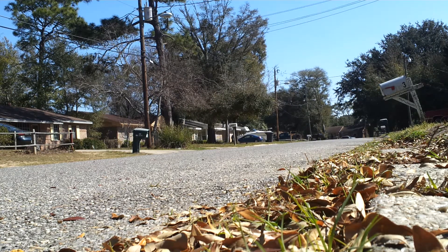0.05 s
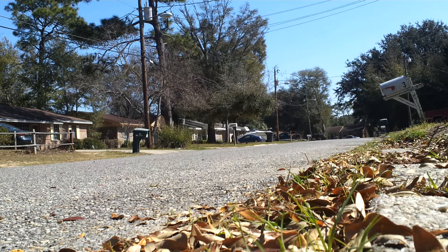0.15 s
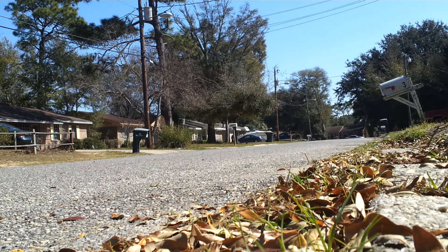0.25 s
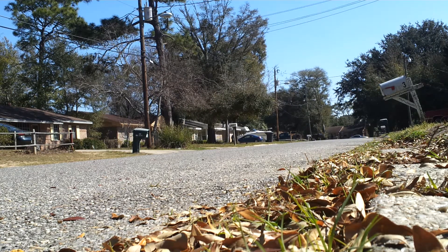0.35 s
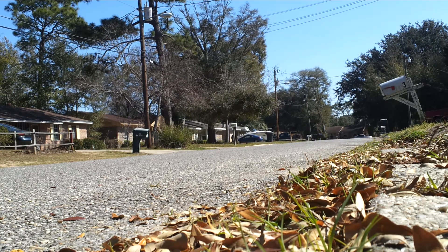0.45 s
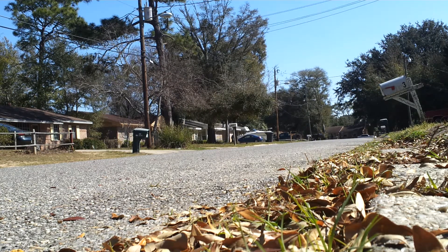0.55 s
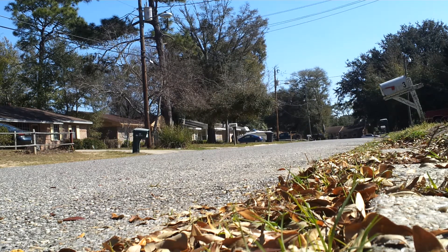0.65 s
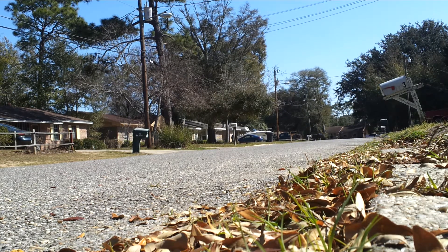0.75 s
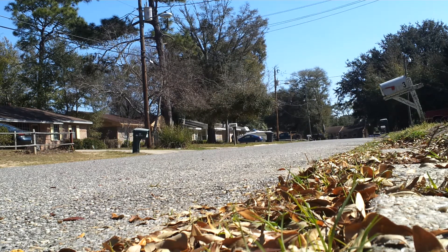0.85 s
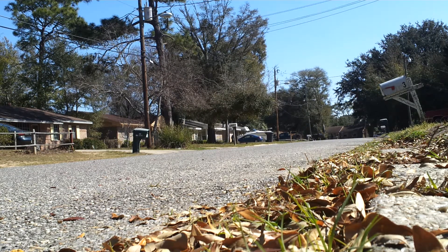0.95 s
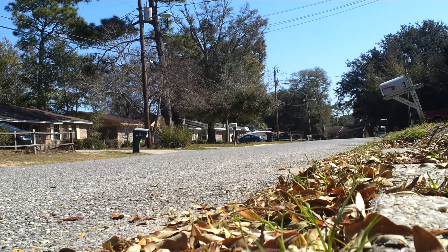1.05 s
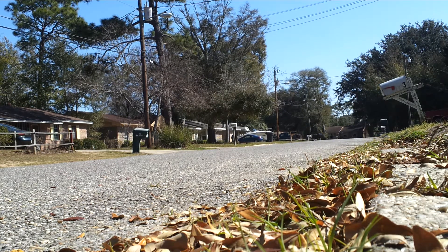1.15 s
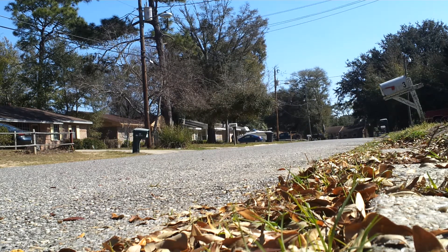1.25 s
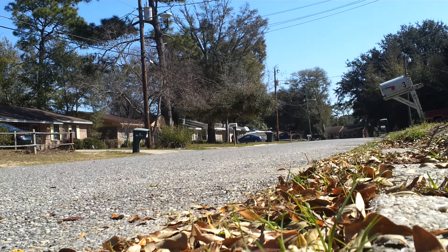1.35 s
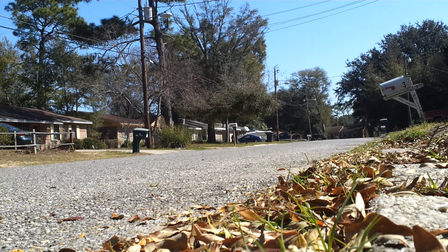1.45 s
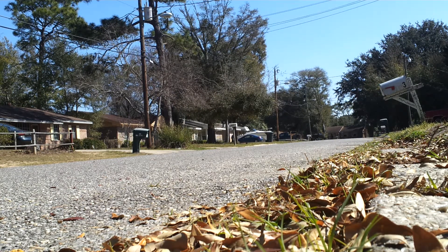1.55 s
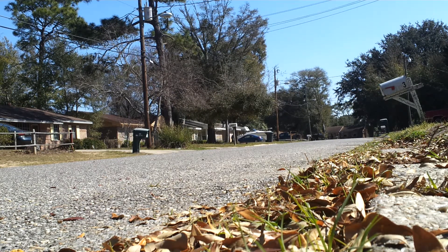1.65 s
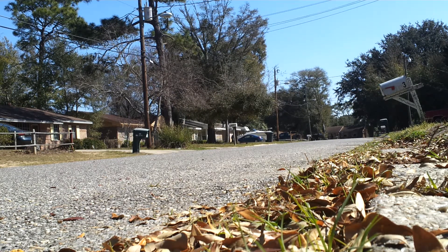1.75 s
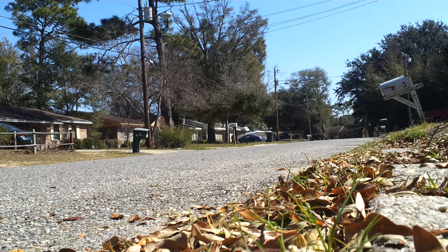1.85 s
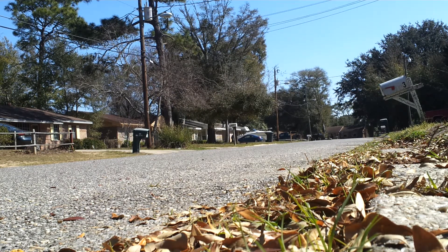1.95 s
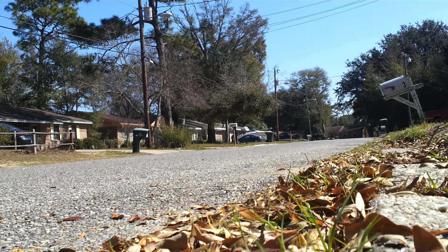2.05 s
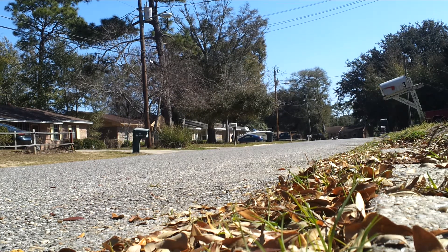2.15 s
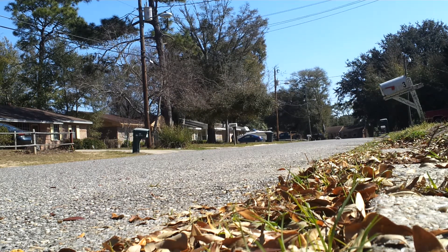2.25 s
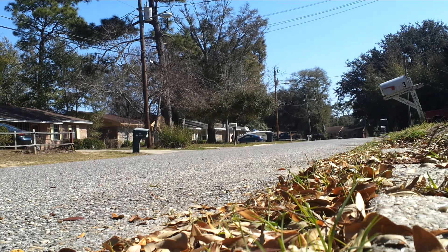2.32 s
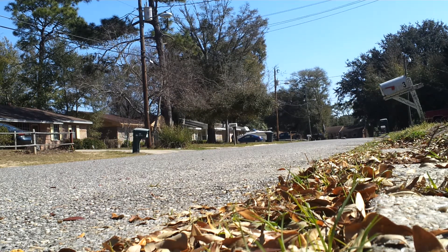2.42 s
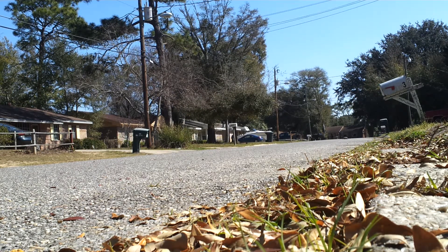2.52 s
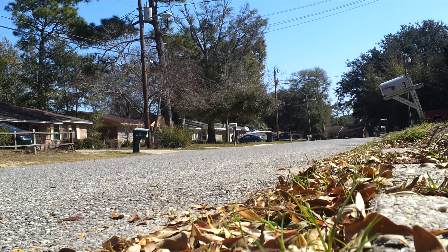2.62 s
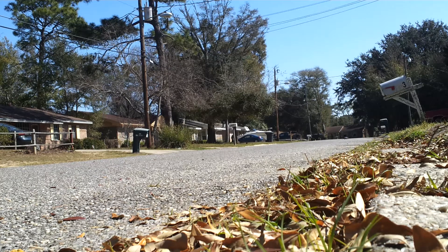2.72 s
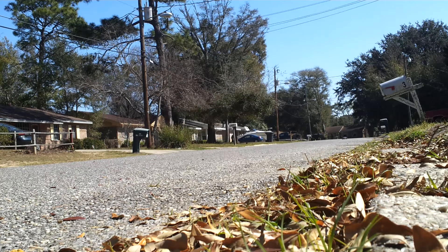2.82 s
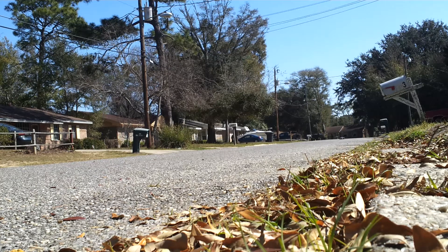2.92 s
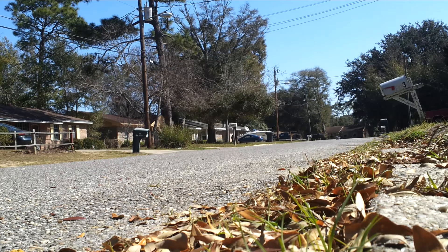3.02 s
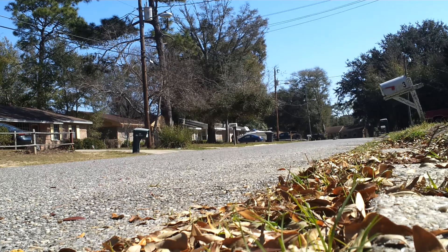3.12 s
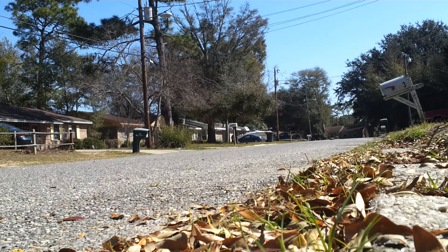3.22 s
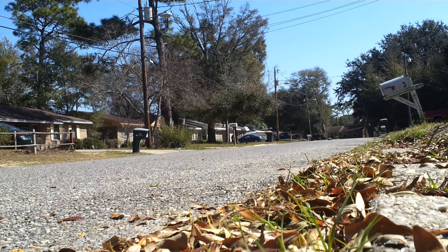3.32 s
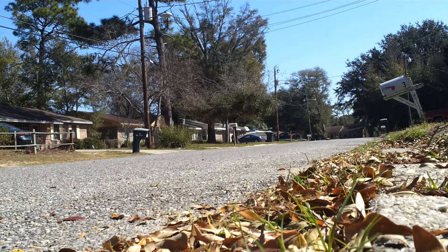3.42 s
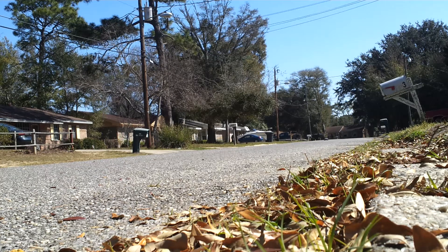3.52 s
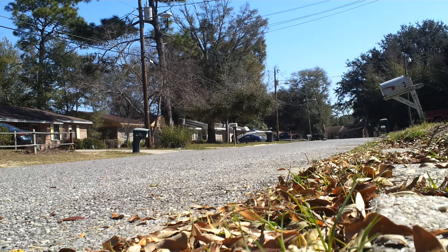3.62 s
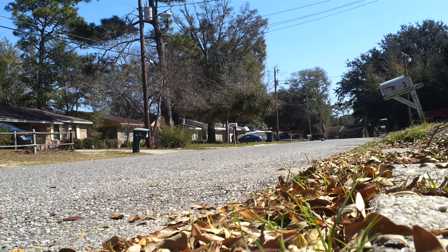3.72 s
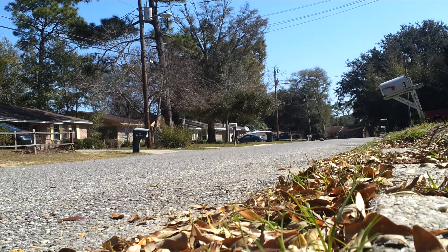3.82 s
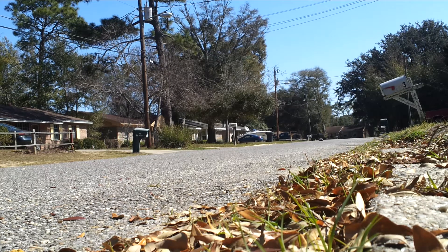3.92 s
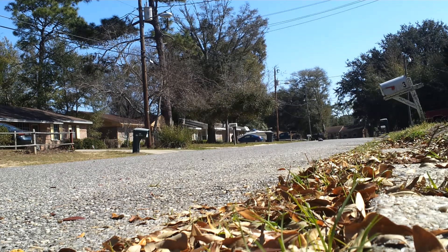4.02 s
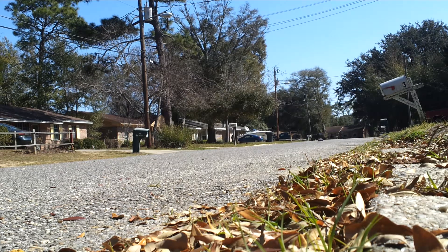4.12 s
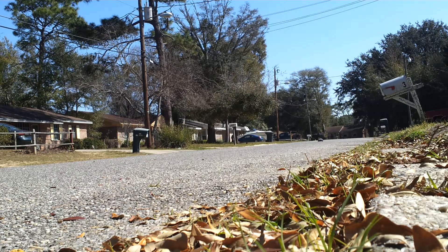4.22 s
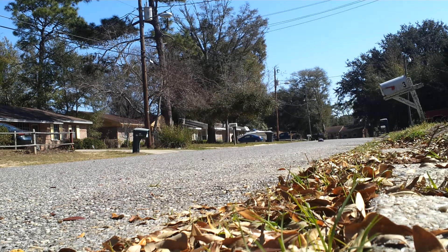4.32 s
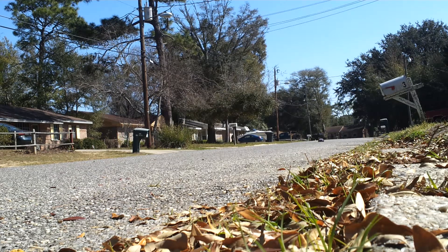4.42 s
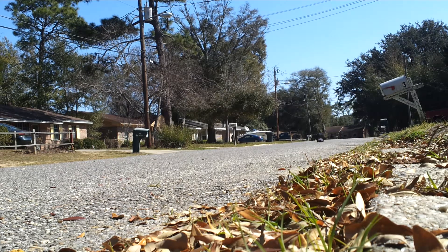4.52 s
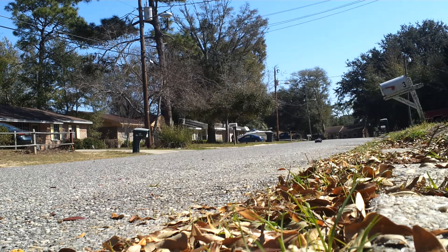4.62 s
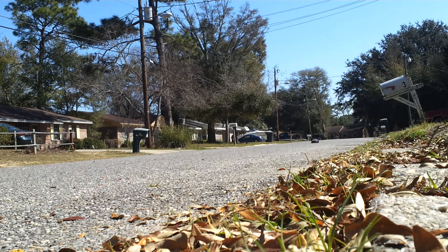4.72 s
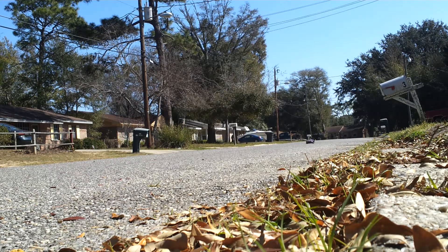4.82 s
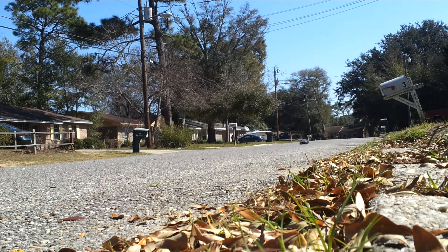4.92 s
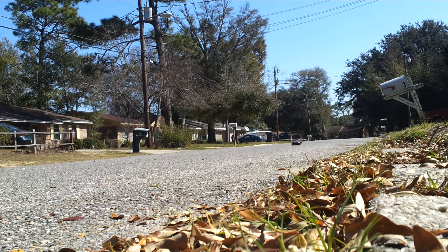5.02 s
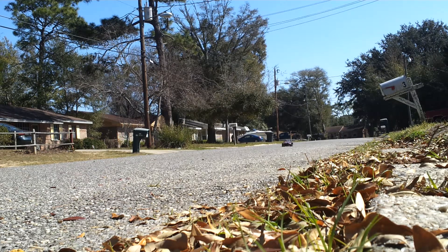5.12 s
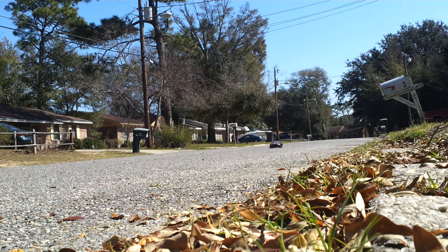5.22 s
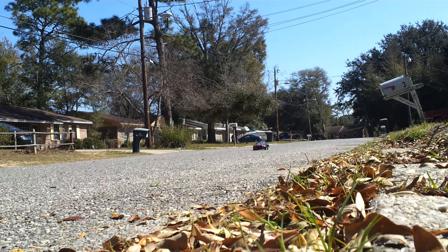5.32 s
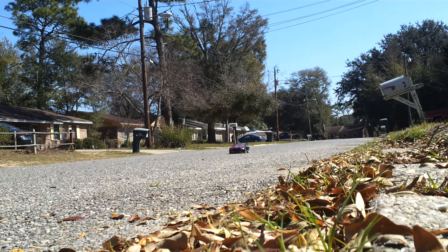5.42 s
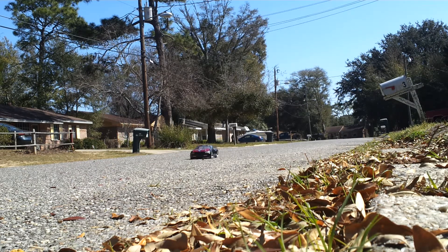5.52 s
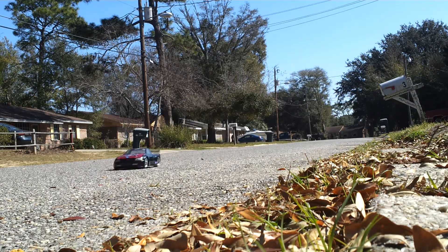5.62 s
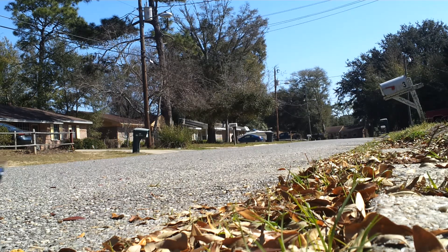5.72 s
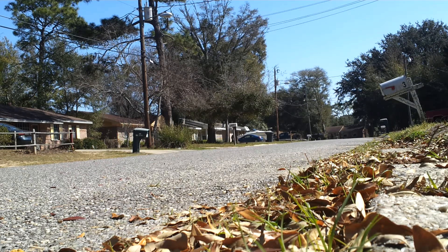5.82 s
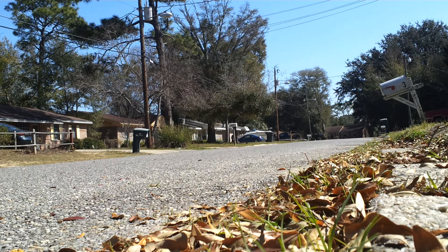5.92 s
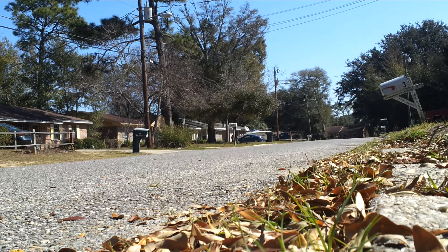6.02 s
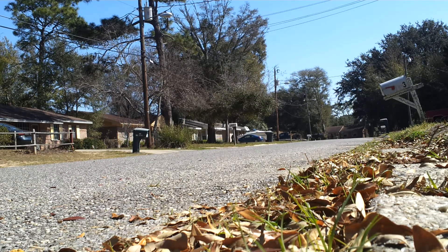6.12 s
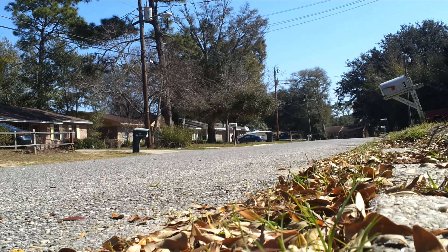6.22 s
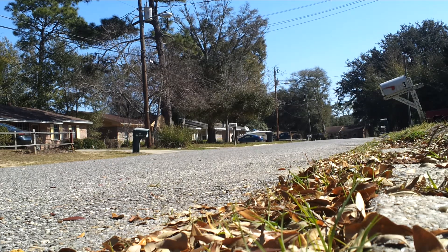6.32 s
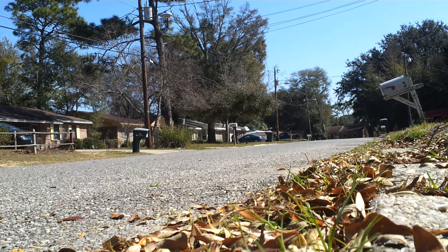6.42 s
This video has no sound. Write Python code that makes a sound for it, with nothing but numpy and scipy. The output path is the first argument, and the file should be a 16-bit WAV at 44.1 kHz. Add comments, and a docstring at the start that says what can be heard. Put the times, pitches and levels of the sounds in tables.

```python
"""A street hushes and a distant engine drones; close by, dry leaves tick and something scuffs on the verge.
A far bird calls once and echoes. Then a small electric radio-controlled truck starts far up the gravelly
street: its motor whine climbs, its gears sing and its hollow tyres roar, crunch grit and fling fine spray.
It races past a microphone at the verge, bumping it with air; then the throttle closes and the whine drops,
while thrown gravel lands in the leaves. Noise, tiny random impacts and fluttering tones make these sounds."""
import sys
import numpy as np
from scipy.fft import rfft, irfft, next_fast_len
from scipy.io import wavfile
from scipy.ndimage import map_coordinates

SR = 44100
rng = np.random.default_rng(int(sys.argv[2]) if len(sys.argv) > 2 else 0)


def store_pcm(level_fs):
    """Save levels as 16-bit WAV."""
    pcm = np.round(np.clip(level_fs, -1, 1) * 32767).astype(np.int16)
    wavfile.write(sys.argv[1], SR, np.atleast_2d(pcm).T)


N = 284886  # length in samples

# Open-air hush, its tone colour: pitch_hz, level_db (per Hz, relative)
STREET_COLOUR = [(25, -24.5), (60, -12), (100, -9), (160, -13), (280, -17.5), (400, -19), (600, -19.5),
                 (1050, -23), (1400, -31), (2200, -31.5), (4500, -33.5), (7000, -41), (12000, -36),
                 (16000, -52)]
# Distant engine swelling under load: centre_s, half_length_s, rise_db (over idle)
ENGINE_SWELLS = [(1.89, 0.28, 8), (3.046, 0.48, 7.5)]
# Flurries of faint leaf ticks: centre_s, half_length_s, level_db
FLURRIES = [(.1, 0.22, -56), (2.21, 0.12, -50), (2.686, 0.46, -57), (3.745, 0.28, -56), (6.256, 0.13, -44)]
# Dull scuffs on the verge: start_s, level_db, t60_s (time to die away by 60 dB)
SCUFFS = [(.06, -46, 0.91), (0.517, -32, 0.23), (.665, -45, 0.54), (0.842, -41, 0.062), (0.865, -38, 0.17),
          (2.233, -27.5, 0.014), (3.074, -41.5, 0.1), (3.218, -31, 0.013), (3.369, -32, .06),
          (3.843, -35, 0.089), (6.16, -28, 0.083)]
# Tone colour of scuffed soil: pitch_hz, level_db (per Hz, relative)
SOIL_COLOUR = [(150, -19), (450, -1), (900, 3), (1300, -2), (1800, -4), (2800, -12.5), (6000, -15),
               (11000, -48)]
# Crunches of leaves and showers of gravel: peak_s, level_db, rise_s, t60_s
CRUNCHES = [(.271, -39, .0016, 0.13), (0.571, -37.5, 0.02, 0.15), (.68, -49.5, 0.064, 0.78),
            (.909, -51, 0.011, 0.78), (1.169, -41.5, .0023, 0.22), (3.577, -35.5, 0.0073, .11),
            (5.348, -30, .0006, 0.016), (6.145, -13.5, 0.0024, 0.04), (6.17, -18.5, 0.0056, 0.12)]
# The loudest leaf ticks and landing chips: start_s, level_db, pitch_hz, snap_db (relative to the tick)
TICKS = [(0.0136, -19.5, 4450, -7), (0.1079, -13.5, 4160, -36), (0.2275, -22.5, 5030, -22),
         (0.27, -23, 4700, -33), (1.1683, -15.5, 4670, -35), (1.3007, -20.5, 4660, -31),
         (1.3372, -18.5, 4500, -15), (1.478, -25.5, 3950, -10), (1.49, -21.5, 4940, -9),
         (1.9542, -23, 4680, 1), (2.0152, -22, 5060, -17), (2.046, -17, 4500, -29),
         (2.0898, -15.5, 6800, -12), (2.1113, -9.5, 3990, -14), (2.116, -12, 4900, -16),
         (2.1263, -10, 4600, -13), (2.1846, -12, 4820, -13), (2.2028, -15, 4300, -23),
         (2.228, -11, 4150, -15), (2.2317, -8, 4700, -19.5), (2.248, -19, 4600, -16),
         (2.3294, -13, 4870, -16), (2.398, -8.5, 3370, -43), (2.4466, -18, 4900, -20),
         (2.5965, -11, 4220, -25), (2.6272, -22, 4460, -15), (2.688, -19.5, 2940, -28),
         (2.8956, -13, 4470, -27), (2.9971, -18, 4140, -20), (3.0743, -18.5, 3080, -11),
         (3.2185, -16.5, 4500, -13.5), (3.583, -26, 6500, 0), (3.6352, -24.5, 6540, -2.5),
         (3.748, -18.5, 4500, -10), (3.762, -26.5, 4970, -4), (3.8679, -17.5, 4160, -24),
         (3.9716, -20.5, 4550, -22), (4.4867, -15.5, 4500, -29), (5.091, -21, 4000, -38),
         (5.1443, -13, 4960, -34), (5.347, -6, 4100, -41), (5.3589, -14, 4000, -38),
         (6.007, -11.5, 4790, -1), (6.1594, 3, 4100, -18), (6.1735, 1.5, 4060, -12.5),
         (6.2579, -11, 3030, -29), (6.3797, -18, 3790, -23)]
# Tyre and body-shell resonances: pitch_hz, width_hz, level_db
SHELL_RINGS = [(619.7, 32, -25), (823, 45, -43), (1083, 50, -30)]
# Tone colour of the hollow tyres' roar: pitch_hz, level_db (per Hz, relative)
ROAR_COLOUR = [(59, -45), (100, -31), (190, -16), (290, -15), (450, -4.5), (620, -3.5), (850, -3),
               (1080, -7.5), (1350, -14.5), (2000, -16.5), (3500, -50)]
# Tone colour of crunching grit: pitch_hz, level_db (per Hz, relative)
GRIT_COLOUR = [(900, -23.5), (1500, -5), (2000, 2.5), (3000, 2.5), (4200, 5), (6000, -2), (8000, -20),
               (12000, -78)]
# Tone colour of the finest flying sand: pitch_hz, level_db (per Hz, relative)
SPRAY_COLOUR = [(4500, -21), (6800, 4), (8000, -0.5), (11300, -4), (15800, -21.5)]

# the distant engine idles and later moves off
ENGINE_HZ, IDLE_DB, ENGINE_LEAVES_S, ENGINE_FADE_DB_PER_S = 60.3, -53, 3.66, 20
# the bird's note ends at BIRD_END_HZ, having started twice the half fall above it
BIRD_S, ECHO_DELAY_S, BIRD_DB, ECHO_DB = 1.405, .15, -52.5, -6
BIRD_END_HZ, BIRD_HALF_FALL_HZ, BIRD_FALL_S = 3320, 170, .03
# the truck starts, nears its top speed, passes, and the throttle closes
START_S, SPEED_UP_S, TOP_M_PER_S = 3.02, 1.4, 13
PASS_S, NEAREST_M = 5.845, .8
COAST_S, COAST_RAMP_S, COAST_DROP_DB, COAST_SAG_PER_S = 6.09, 0.024, 19, .12
# two gear whines
MESH_HZ, UPPER_HZ, WHINE_DB = 4710, 5410, -6.5
# the motor spinning up far away
LAUNCH_HZ, LAUNCH_RISE_HZ_PER_S = 4650, 3150
LAUNCH_PEAK_S, LAUNCH_END_S = 3.24, 3.92
LAUNCH_DB, LAUNCH_RISE_S, LAUNCH_T60_S, LAUNCH_RELEASE_S = -51.5, .1, 3.4, .18


def amp(db):
    """Turn decibels into a gain."""
    return 10 ** (np.asarray(db) / 20)


def unit(x):
    """Scale x to an average (rms) strength of 1."""
    return x / np.sqrt(np.mean(x ** 2) + 1e-20)


def since(s):
    """Seconds since time s, for each sample; negative before it."""
    return np.arange(N) / SR - s


def bump(s, half_s, height):
    """A smooth hump centred on time s."""
    return height * np.exp(-(since(s) / half_s) ** 2 / 2)


def swell(t, rise, t60):
    """A loudness curve that rises to 1 at t = 0, then falls 60 dB in t60 seconds."""
    attack = (np.minimum(t, 0) / rise) ** 2 / 2
    decay = np.log(1000) * np.maximum(t, 0) / t60
    return np.exp(-attack - decay)


def wobble(rate):
    """A smooth curve through random values, rate of them a second."""
    knots = rng.standard_normal(int(N * rate / SR) + 4)
    return map_coordinates(knots, [np.arange(N) * rate / SR])


def filtered(x, response):
    """Strengthen or weaken each frequency of x by the response."""
    m = next_fast_len(len(x) + 8192)  # padding stops the end spilling onto the start
    hz = np.fft.rfftfreq(m, 1 / SR) + 1  # the 1 keeps logarithms finite
    return irfft(rfft(x, m) * response(hz), m)[:len(x)]


def coloured(x, points):
    """Give x a tone colour drawn through (Hz, dB) points, at rms 1."""
    f, db = np.transpose(points)
    return unit(filtered(x, lambda hz: amp(np.interp(np.log(hz), np.log(f), db))))


def band(x, centre_hz, octaves):
    """Keep a soft-edged band of x around one pitch, at rms 1."""
    return unit(filtered(x, lambda hz: np.exp(-.5 * (np.log2(hz / centre_hz) / octaves) ** 2)))


def grains(rate, spread_db):
    """Tiny impacts of uneven size at random moments, rate of them a second, at rms 1."""
    hit = rng.random(N) < rate / SR
    sign = rng.choice([-1, 1], N)
    size = amp(spread_db * np.clip(rng.standard_normal(N), -2, 2))
    return unit(hit * sign * size)


def fuzzy_tone(hz, width_hz):
    """A tone whose strength and phase flutter, smearing it into a narrow band."""
    phase = 2 * np.pi * np.cumsum(hz) / SR
    return unit(wobble(width_hz) * np.cos(phase) + wobble(width_hz) * np.sin(phase))


def add(track, s, sound):
    """Mix a sound into the track at time s."""
    part = track[max(round(s * SR), 0):][:len(sound)]
    part += sound[:len(part)]


def street():
    """Open-air hush is coloured noise; a distant engine drones on two wavering, flickering tones."""
    leaving = np.maximum(since(ENGINE_LEAVES_S), 0)
    engine_db = IDLE_DB + sum(bump(*row) for row in ENGINE_SWELLS) - ENGINE_FADE_DB_PER_S * leaving
    phase = 2 * np.pi * np.cumsum(ENGINE_HZ + 0.28 * wobble(3.9)) / SR
    flutter_db = 1.1 * wobble(8)
    # the tone an octave above ENGINE_HZ is the stronger one
    tones = unit(np.sin(2 * phase) + amp(-13) * np.sin(phase))
    drone = amp(engine_db + flutter_db) * tones
    hush = amp(-47.5) * coloured(rng.standard_normal(N), STREET_COLOUR)
    return hush + drone


def bird():
    """A far bird's short note falls in pitch, followed by a weaker, longer echo."""
    def note(t, rise, t60):
        """One fluttering note that glides down around t = 0."""
        hz = BIRD_END_HZ + BIRD_HALF_FALL_HZ * (1 - np.tanh(t / BIRD_FALL_S))
        return swell(t, rise, t60) * fuzzy_tone(hz, width_hz=420)
    call = note(since(BIRD_S), rise=0.0088, t60=.35)
    echo = note(since(BIRD_S + ECHO_DELAY_S), rise=.025, t60=1.1)
    return amp(BIRD_DB) * (call + amp(ECHO_DB) * echo)


def rustle():
    """Faint ticks of three leaf sizes come in flurries, over a fine crinkling of the litter."""
    level = amp(-67) + sum(bump(s, half_s, amp(db)) for s, half_s, db in FLURRIES)
    leaf_pitches_hz = [3200, 4620, 5670]
    leaves = unit(sum(band(grains(rate=18, spread_db=5.5), hz, octaves=0.35) for hz in leaf_pitches_hz))
    crinkle = amp(-1) * band(grains(rate=1500, spread_db=6), centre_hz=4600, octaves=.55)
    return level * (leaves + crinkle)


def scuffs():
    """Each scuff is a dull, lumpy cloud of grains; the longer it lasts, the softer it starts."""
    level = sum(amp(db) * swell(since(s), 0.035 * t60, t60) for s, db, t60 in SCUFFS)
    crumbs = grains(rate=2500, spread_db=4)
    return level * coloured(crumbs, SOIL_COLOUR)


def crunches():
    """Each crunch of leaves or shower of gravel is a bright cloud of grains that swells and dies away."""
    level = sum(amp(db) * swell(since(s), rise, t60) for s, db, rise, t60 in CRUNCHES)
    return level * band(grains(rate=9700, spread_db=6), centre_hz=3630, octaves=0.68)


def ticks():
    """A brittle leaf gives way in two quick steps, faint then full, each a mix of ringing and noise."""
    out = np.zeros(N)
    t = np.arange(SR // 40) / SR
    for s, db, ring_hz, snap_db in TICKS:
        noise = rng.standard_normal((3, len(t)))
        # each part starts at its own level and falls 60 dB in the time it is divided by
        ring = amp(-3 - 60 * t / 0.0037) * np.sin(2 * np.pi * ring_hz * t)
        crack = amp(-9 - 60 * t / 0.0023) * np.sin(2 * np.pi * 0.63 * ring_hz * t)
        crinkle = amp(-16.5 - 60 * t / 0.0089) * band(noise[0], centre_hz=3970, octaves=0.42)
        snap = amp(snap_db - 60 * t / 0.008) * band(noise[1], centre_hz=11100, octaves=0.86)
        knock = amp(-38 - 60 * t / .019) * band(noise[2], centre_hz=900, octaves=.9)
        onset = 1 - np.exp(-t / 0.00015)
        tick = amp(db + 1.5) * (ring + crack + crinkle + snap + knock) * onset
        add(out, s, amp(-18.0) * tick)
        add(out, s + 0.00067 * rng.uniform(.6, 2.2), tick)
    return out


def pace():
    """The truck's share of its top speed: a hard start that levels off."""
    return np.tanh(np.maximum(since(START_S), 0) / SPEED_UP_S)


def heard_from_verge(sound, falloff, rear_db):
    """Sound from the moving truck arrives late and weakened by distance, and its level differs behind it."""
    road = np.cumsum(TOP_M_PER_S * pace()) / SR
    past = road - np.interp(0, since(PASS_S), road)  # metres beyond the nearest point
    distance = np.hypot(past, NEAREST_M)
    delay = distance / 343 * SR  # sound travels 343 m/s; the changing delay bends the pitch
    # treble skimming the road fades faster than 1 / distance, so it gets a larger falloff
    gain = (NEAREST_M / distance) ** falloff * amp(rear_db * past / distance)
    return map_coordinates(sound, [np.arange(N) - delay]) * gain


def draught():
    """Air pushed aside by the truck bumps the microphone just after it passes: a gust of low noise."""
    gust = swell(since(PASS_S + .025), rise=.02, t60=0.45)
    return amp(-39) * gust * band(rng.standard_normal(N), centre_hz=55, octaves=1.6)


def launch():
    """Full throttle far up the street: the motor's hoarse, fluttering whine rises steadily and fades."""
    hz = LAUNCH_HZ + LAUNCH_RISE_HZ_PER_S * np.maximum(since(START_S), 0)
    release = np.clip(-since(LAUNCH_END_S) / LAUNCH_RELEASE_S, 0, 1)
    level = swell(since(LAUNCH_PEAK_S), LAUNCH_RISE_S, LAUNCH_T60_S) * release
    flutter = amp(LAUNCH_DB + 1.3 * wobble(25.33))
    return flutter * level * fuzzy_tone(hz + 190 * wobble(400), width_hz=750)


def gears():
    """Rattling gear teeth sing two rough whines and a hiss; off the throttle they quieten and the whines sag."""
    coasting = np.maximum(since(COAST_S), 0)
    sag = 1 - COAST_SAG_PER_S * coasting
    whine_db = WHINE_DB - COAST_DROP_DB * np.minimum(coasting / COAST_RAMP_S, 1)
    # the wheels skip beside the microphone: each height is a share of pitch gained
    mesh_hz = MESH_HZ * (sag + bump(5.87, .035, height=.1))
    upper_hz = UPPER_HZ * (sag + bump(5.94, 0.09, height=0.18)) + 200 * wobble(300)
    mesh = amp(-5.5) * fuzzy_tone(mesh_hz, width_hz=560)
    upper = amp(-4.5) * fuzzy_tone(upper_hz, width_hz=1100)
    hiss = amp(-15) * band(rng.standard_normal(N), centre_hz=6460, octaves=0.18)
    level = np.sqrt(pace()) * amp(whine_db + 1.6 * wobble(60))
    return heard_from_verge(level * (mesh + upper + hiss), falloff=1.674, rear_db=-0.5)


def tyres():
    """Road stones drum on the hollow tyres, crunch under them and fly off as fine spray."""
    hop_db = 0.99 * wobble(45)  # the light chassis hops on the rough road
    contact = pace() * amp(hop_db)
    ring = sum(amp(db) * fuzzy_tone(np.full(N, hz), width) for hz, width, db in SHELL_RINGS)
    roar = amp(-14.5) * coloured(grains(rate=4000, spread_db=3), ROAR_COLOUR) + ring
    grit = amp(-14.0) * coloured(grains(rate=3500, spread_db=2), GRIT_COLOUR)
    spray = amp(-14.0) * coloured(grains(rate=5000, spread_db=5.0), SPRAY_COLOUR)
    return (heard_from_verge(contact * roar, falloff=1.137, rear_db=0.24)
            + heard_from_verge(contact * grit, falloff=1.466, rear_db=0.5)
            + heard_from_verge(contact * spray, falloff=1.844, rear_db=1.6))


def scene():
    """Everything as it reaches the one microphone."""
    background = street() + bird()
    verge = rustle() + scuffs() + crunches() + ticks()
    truck = draught() + launch() + gears() + tyres()
    return (background + verge + truck)[None]


def record(dry):
    """High peaks are rounded off; the sound is much duller above 12 kHz and silent above 15.9 kHz."""
    ceiling, hardness = .74, 6
    rounded = dry[0] / (1 + np.abs(dry[0] / ceiling) ** hardness) ** (1 / hardness)

    def treble(hz):
        """Gain that slopes down by 20 dB, then stops dead at 15900 Hz."""
        return amp(np.interp(hz, [11500, 12200], [0, -20])) * (hz < 15900)
    return filtered(rounded, treble)[None]


dry = scene()
out = record(dry)
store_pcm(out)
```